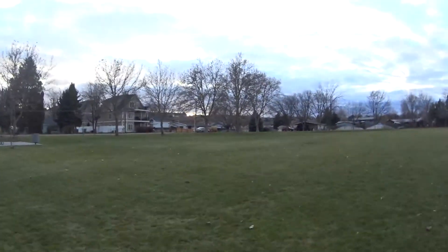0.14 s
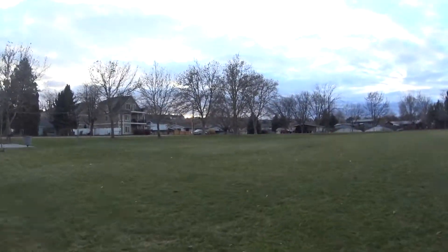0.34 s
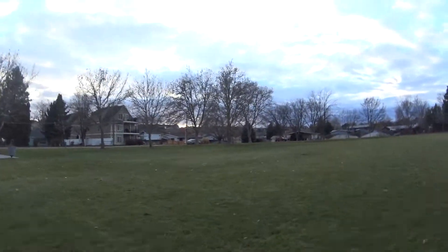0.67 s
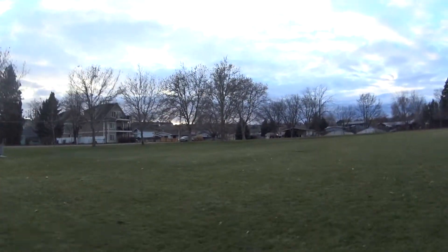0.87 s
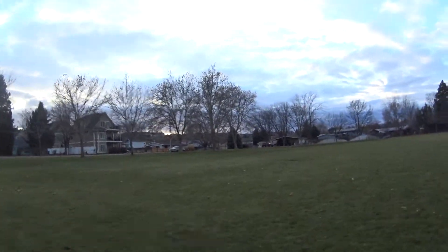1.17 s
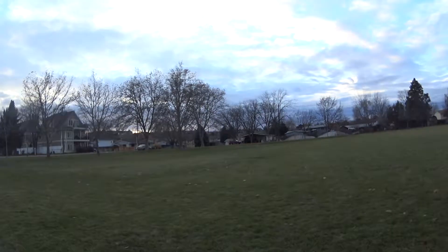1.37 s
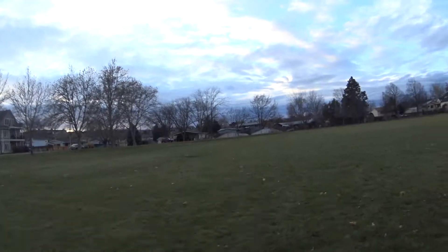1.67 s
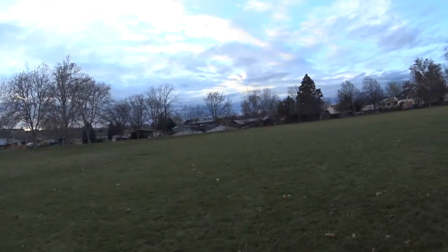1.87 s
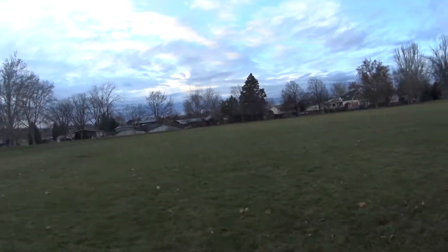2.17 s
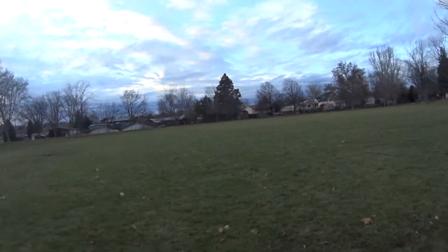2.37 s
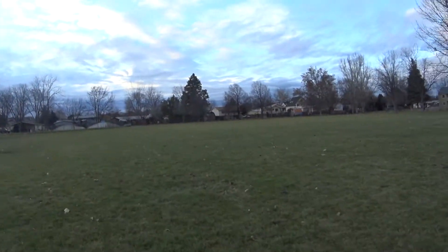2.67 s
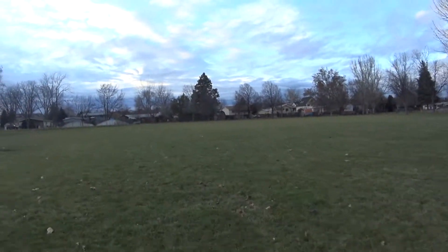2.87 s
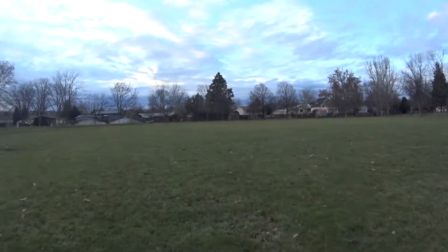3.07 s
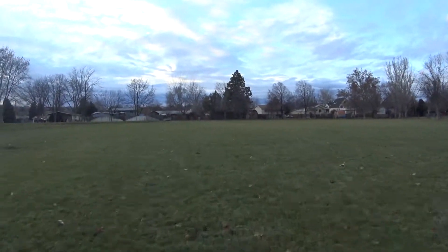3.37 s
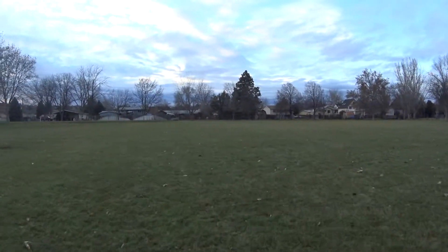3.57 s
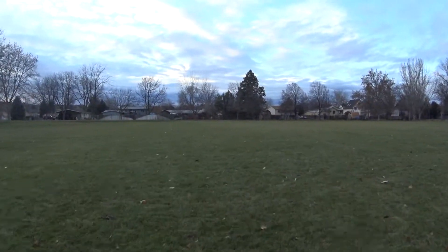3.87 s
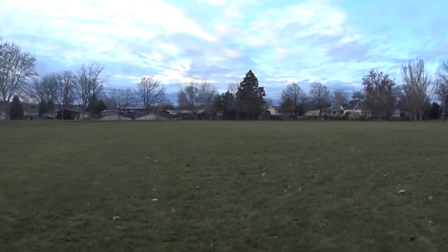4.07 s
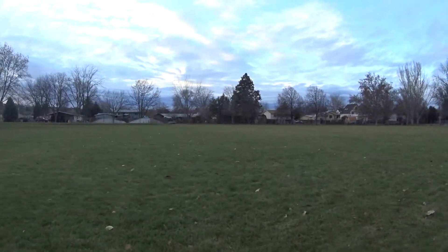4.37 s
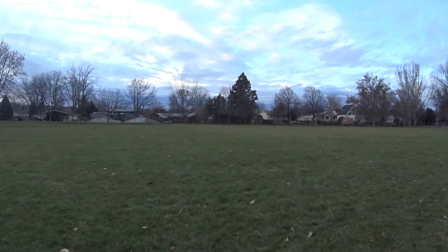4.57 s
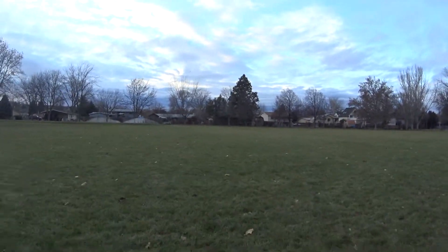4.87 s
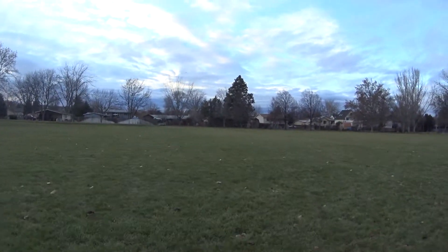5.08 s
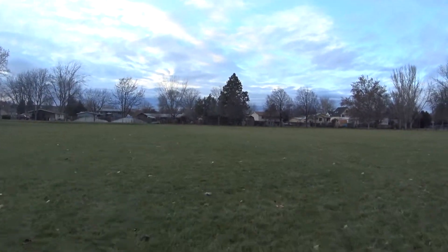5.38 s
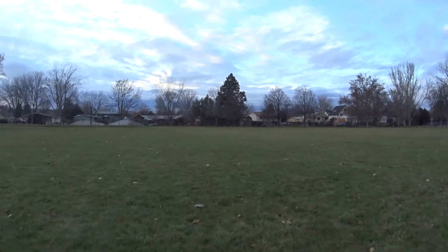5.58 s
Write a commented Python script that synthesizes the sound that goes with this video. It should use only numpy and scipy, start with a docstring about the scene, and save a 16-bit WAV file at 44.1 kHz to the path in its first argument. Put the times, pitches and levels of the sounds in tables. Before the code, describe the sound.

A six-rotor drone flies over a wide lawn, heard very close from the camera it carries, in dry outdoor stereo. The sound runs at full level from start to end: a harmonically rich buzz on a low hum near 135-147 Hz, made of six slightly different pitches that beat and waver. Chopped air rush, a mid-high rasp and fine hiss pulse with the blades, while faint motor singing and a thin steady whine near 8 kHz sit above. From 0 to 1 s the hover is fairly even, with a tiny lull and slap around 0.65 s. From about 1.2 s the turn raises the pitch and spreads the tones, roughest near 2.5 s, with slightly more low wind rumble. By 3.3 s the pitch drops and the tones gather into slower beating; the hiss is slightly brighter around 4.3 s. Brief slaps come near 2.3, 4.2, 4.9 and 5.0 s. The tones spread and rise again towards the end at 5.7 s.

```python
"""Over a lawn a six-rotor drone hovers and turns, heard from the camera that it carries.
Each propeller radiates harmonics of its own blade-pass rate; they beat, and spread apart in the turn.
Chopped turbulence rushes, rasps and hisses with the buzz, and vortices met by the blades slap.
The motors sing, their drives whine near 8 kHz by amplitude modulation, and an airstream rumbles."""
import sys
import numpy as np
from scipy import signal
from scipy.fft import rfft, irfft, next_fast_len
from scipy.io import wavfile
from scipy.ndimage import uniform_filter1d, map_coordinates

SR = 44100
rng = np.random.default_rng(int(sys.argv[2]) if len(sys.argv) > 2 else 0)


def transcribe(u):
    """Save the signal u as a 16-bit wav file named by the first command-line argument.

    u: samples, shape (n,) or (channels, n), limited to [-1, 1]; the rate is SR.
    q: integer samples, one column per channel.
    """
    v = np.clip(np.atleast_2d(u).T, -1, 1)
    q = np.round(v * 32767).astype(np.int16)
    wavfile.write(sys.argv[1], SR, q)


N = 253134  # length [samples]


def amp(db):
    """Level law: decibels to amplitude ratio."""
    return 10 ** (np.asarray(db) / 20)


def unit(x):
    """Normalisation to an rms of 1."""
    return x / np.sqrt(np.mean(x ** 2) + 1e-20)


def along(points, hz):
    """Linear interpolation of (position, value) points on a logarithmic axis."""
    position, value = np.transpose(points)
    return np.interp(np.log(hz + 1e-9), np.log(position), value)


def curves(rows):
    """Linear interpolation in time: one curve for each column after the time."""
    seconds, *columns = np.transpose(rows)
    t = np.arange(N) / SR
    return np.array([np.interp(t, seconds, column) for column in columns])


def wobble(rate):
    """Band-limited random fluctuation: a smooth curve through rate random knots a second."""
    knots = rng.standard_normal(int(N * rate / SR) + 4)
    return map_coordinates(knots, [np.arange(N) * rate / SR])


def filtered(x, response):
    """Linear filtering: the spectrum is multiplied by a complex response of frequency."""
    size = next_fast_len(N + SR // 2)
    hz = np.fft.rfftfreq(size, 1 / SR)
    return irfft(rfft(x, size) * response(hz), size)[..., :N]


def coloured(x, spectrum):
    """Spectral shaping by (frequency, level) points, at rms 1."""
    return unit(filtered(x, lambda hz: amp(along(spectrum, hz))))


# where each propeller runs within the spread of speeds (share of the spread, 0 = nominal rate)
SPEED_SHARES = [-.5, -.18, -.03, .08, .22, .45]


def blade_passes(nominal_hz, spread_hz, hunt, hunt_rate):
    """Phase is integrated frequency: blade passes counted as the flight controller trims each speed."""
    passes = []
    for share in SPEED_SHARES:
        rate_hz = (nominal_hz + share * spread_hz) * (1 + hunt * wobble(hunt_rate))
        passes.append(np.cumsum(rate_hz) / SR + 2 * rng.random())
    return np.array(passes)


# harmonics of one propeller: (multiple of the blade-pass rate, level [dB])
BLADE_HARMONICS = [(.5, -46), (1, -38), (2, -30), (3, -28), (4, -31.5), (5, -33), (6, -33), (7, -38.5),
                   (9, -39), (12, -50.5), (15, -45.5), (20, -58.5)]
# how strongly each propeller's fundamental and half-rate line reach the camera: (level [dB])
THRUM_DB = [3.5, -3.5, -11.5, -4, -7, 3.5]
# how strongly each propeller's overtones reach the camera, also its share of the air noise: (level [dB])
BITE_DB = [-6, -2, -3, 1.5, -1.5, -5.5]
# a propeller that runs faster than the others carries more load and buzzes louder [dB per Hz]
LOAD_DB_PER_HZ = 0.09


def buzz(passes, imbalance_db, flutter_db, flutter_rate, count=40, size=4096):
    """Periodic blade loading: one pressure wave per turn; unequal blades add lines halfway."""
    multiple = np.arange(1, count + 1) / 2  # two blades, so one turn is two blade passes
    out = np.zeros(N)
    for blade, thrum_db, bite_db in zip(passes, THRUM_DB, BITE_DB):
        level_db = along(BLADE_HARMONICS, multiple)
        level_db += imbalance_db * (multiple % 1 > 0)
        level_db += np.where(multiple > 1, bite_db, thrum_db)
        lines = amp(level_db) * np.exp(2j * np.pi * rng.random(count))
        turn = irfft(np.append(0, lines), size) * size / np.sqrt(2)
        turn = np.append(turn, turn[0])  # closes the cycle
        wave = np.interp(blade / 2 % 1 * size, np.arange(size + 1), turn)
        lead_hz = np.gradient(blade - passes.mean(axis=0)) * SR
        # uneven inflow changes the blade load
        load_db = LOAD_DB_PER_HZ * lead_hz + flutter_db * wobble(flutter_rate)
        out += wave * amp(load_db)
    return out


# the airframe passes some pitches better than others: (frequency [Hz], gain [dB])
AIRFRAME_GAIN = [(130, -0.5), (150, -2.5), (270, -0.5), (405, -1.5), (432, 3.5), (470, 0.5), (535, 6),
                 (600, -3), (690, -0.5), (820, 3), (880, -5), (1080, 0.5)]


def airframe(x):
    """Structural transmission: the frame favours some pitches of the buzz."""
    return filtered(x, lambda hz: amp(along(AIRFRAME_GAIN, hz)))


# singing of the motors' magnets: (multiple of the blade-pass rate, level before flutter [dB])
MAGNET_TONES = [(21, -59), (32, -59)]


def magnets(passes, flutter_db):
    """Magnetic excitation: magnets sweep past stator teeth at high multiples of the blade-pass rate."""
    out = np.zeros(N)
    for blade in passes:
        tones = sum(amp(db) * np.sin(2 * np.pi * k * blade) for k, db in MAGNET_TONES)
        out += amp(flutter_db * wobble(45)) * tones
    return out


def chopping(passes, sharpness):
    """Periodic amplitude modulation: a puff of air each time a blade crosses its arm."""
    puffs = np.exp(sharpness * np.cos(2 * np.pi * passes))
    return unit(np.sqrt(amp(BITE_DB) ** 2 @ puffs))  # the propellers' powers add


# brief lulls in the inflow: (time [s], change before normalisation [dB])
INFLOW_LULLS = [(.677, -7.5)]


def gusts(depth_db, rate, lull_width):
    """Random amplitude modulation: the gain of blade noise in uneven inflow, at rms 1."""
    t = np.arange(N) / SR
    lull_db = sum(db * np.exp(-((t - s) / lull_width) ** 2) for s, db in INFLOW_LULLS)
    return unit(amp(depth_db * wobble(rate) + lull_db))


def air_noise(envelope, spectrum, channels):
    """Broadband turbulence: random noise shaped in time, then in frequency, at rms 1."""
    return coloured(envelope * rng.standard_normal((channels, N)), spectrum)


def patchy(x, depth_db):
    """Turbulent intermittency: passing eddies make neighbouring bands swell and fade on their own."""
    bands = signal.stft(x, nperseg=1024)[2]
    field = uniform_filter1d(rng.standard_normal(bands.shape), size=7, axis=0)  # across frequency
    field = uniform_filter1d(field, size=8, axis=1)  # across time
    return unit(signal.istft(bands * amp(depth_db * unit(field)))[1][:N])


# turbulent air off the blades: (frequency [Hz], relative spectral level [dB])
WASH_SPECTRUM = [(90, -33.5), (180, -12.5), (300, -10.5), (480, 0.5), (640, -1.5), (850, 2), (1080, 0),
                 (1300, 1), (1600, -7.5), (2300, -19.5), (3300, -64)]
WASH_DB, EDDY_DB = -20, -33  # levels before the slow swells


def wash(inflow, chop, swell_db):
    """Modulated turbulence: the chopped rush off the blades, common to both ports."""
    rush = air_noise(inflow ** 0.55 * chop, WASH_SPECTRUM, channels=1)[0]
    return amp(WASH_DB + swell_db) * patchy(rush, depth_db=2.0)


def port_eddies(chop, swell_db):
    """Incoherent turbulence: independent chopped noise at each port."""
    return amp(EDDY_DB + swell_db) * air_noise(chop, WASH_SPECTRUM, channels=2)


# rasp of the blades passing the arms: (frequency [Hz], relative spectral level [dB])
RASP_SPECTRUM = [(500, -29.5), (1200, -3.5), (1600, -2.5), (1920, 4.5), (2250, 2), (2370, -7.5),
                 (2550, 2.5), (2750, -13.5), (3300, -18.5), (4000, -21.5), (4600, -19.5), (5800, -40.5)]
RASP_DB = -26  # before the swells and the treble changes
RASP_FOLLOWS = 0.57  # share of the treble change that the rasp follows


def arm_rasp(inflow, passes, treble_db, swell_db):
    """Blade-arm interaction: noise pulsed as blades pass the arms."""
    rasp = air_noise(inflow * chopping(passes, sharpness=1.3), RASP_SPECTRUM, channels=1)[0]
    return amp(RASP_DB + RASP_FOLLOWS * treble_db + swell_db) * patchy(rasp, depth_db=1.0)


# a propeller cuts through a vortex for a few blade passes: (time [s], peak level [dB])
VORTICES = [(.09, -24), (.21, -28), (0.636, -20), (1.045, -23), (2.17, -25.5), (2.328, -20.5), (4.16, -20),
            (4.859, -19), (5.035, -20)]
# colour of those slaps: (frequency [Hz], relative spectral level [dB])
SLAP_SPECTRUM = [(400, -26), (1500, -2.5), (2200, 3.5), (3000, -4), (4600, -10), (6000, -24), (9000, -32)]


def slaps(passes, width, sharpness, stray_db, scatter_db):
    """Blade-vortex interaction: a smack per blade pass in a vortex; weak ones come and go all the time."""
    t = np.arange(N) / SR
    vortex = sum(amp(db) * np.exp(-((t - s) / width) ** 2) for s, db in VORTICES)
    stray = amp(stray_db + scatter_db * np.minimum(wobble(35), 2))
    strongest = passes[np.argmax(BITE_DB)]
    smacks = np.exp(sharpness * (np.cos(2 * np.pi * strongest) - 1))
    return (vortex + stray) * smacks * air_noise(1, SLAP_SPECTRUM, channels=1)[0]


# fine hiss of the blade tips: (frequency [Hz], relative spectral level [dB])
HISS_SPECTRUM = [(600, -34.5), (1500, -4), (2400, 0.5), (2950, 4.5), (3400, -4.5), (4600, -5), (5600, -7.5),
                 (7400, -8), (8200, -6), (8850, -15.5), (9200, -41.5)]
# the hiss at the two ports: (frequency [Hz], left minus right [dB])
HISS_SIDE = [(2500, -2), (2900, 3), (3500, -3.5), (4200, -4), (4900, 4.5), (5700, -3.5), (6300, 2.5),
             (6700, 1), (7000, 11), (7300, -3.5), (7800, 1.5), (8300, 3.5)]
HISS_DB = -36  # before the swells, the treble changes and the port difference


def tip_hiss(envelope, treble_db, swell_db):
    """Path dependence of short waves: the tip hiss reaches each port by different paths."""
    def port_gains(hz):
        half_db = along(HISS_SIDE, hz) / 2
        return amp([half_db, -half_db])

    hiss = filtered(air_noise(envelope, HISS_SPECTRUM, channels=2), port_gains)
    return amp(HISS_DB + treble_db + swell_db) * hiss


# switching rate of each motor drive: (frequency [Hz])
DRIVE_CARRIERS = [7983.7, 7985.4, 7996.5, 8030.4, 8042.7, 8041.9]
# shares of the drives in the whine: (left level [dB], right level [dB])
DRIVE_SHARES = [(-4.5, -7.5), (-13.5, 0.5), (-4, -17.5), (0.5, 2), (0, 2), (-10, -12.5)]
# level at zero spread [dB], its fall as the propellers spread apart [dB per Hz]
WHINE_DB, WHINE_DROP_DB_PER_HZ = -46.5, 0.25
WHINE_WAVER_DB, WHINE_WAVER_RATE = 1, 9.8  # depth [dB], rate [knots per s]


def whine(passes, spread_hz, depth, second, flutter, flutter_rate):
    """Amplitude modulation: six switching tones beat; each blade's load puts sidebands around its own."""
    level_db = WHINE_DB - WHINE_DROP_DB_PER_HZ * spread_hz
    level_db += WHINE_WAVER_DB * wobble(WHINE_WAVER_RATE)
    t = np.arange(N) / SR
    out = np.zeros((2, N))
    for hz, port_db, blade in zip(DRIVE_CARRIERS, DRIVE_SHARES, passes):
        shake = flutter * wobble(flutter_rate)
        for port, db in enumerate(port_db):
            angle = 2 * np.pi * (blade + rng.random())
            load = unit(np.cos(angle) + second * np.cos(2 * angle))
            carrier = np.sin(2 * np.pi * hz * t + port * np.pi / 2)  # ports a quarter cycle apart
            out[port] += amp(db) * unit((1 + depth * load + shake) * carrier)
    return amp(level_db) * out


# airstream on the microphone: (time [s], level before gusts [dB])
AIRSTREAM_LEVEL = [(0, -43.5), (1.2, -42.5), (2.6, -38), (3.3, -48), (5.74, -45)]
# its rumble: (frequency [Hz], relative spectral level [dB])
RUMBLE_SPECTRUM = [(20, -5), (50, -4.5), (85, 0), (130, 6.5), (220, -5.5), (400, -21), (900, -39)]


def airstream(gust_db):
    """Flow-induced pressure: air rumbles over the microphone as low noise in gusts."""
    [level_db] = curves(AIRSTREAM_LEVEL)
    rumble = air_noise(1, RUMBLE_SPECTRUM, channels=1)[0]
    return amp(level_db + gust_db * wobble(6.7)) * rumble


# level between the two microphone ports: (frequency [Hz], left minus right [dB])
PORT_LEVEL = [(100, .6), (300, -0.1), (550, -1.8), (800, -1.1), (1000, -4), (1400, -6), (2200, -8),
              (2800, -5), (4500, -3)]
# phase between the two ports: (frequency [Hz], lead of the left [rad])
PORT_PHASE = [(30, -.2), (70, -.5), (140, -.6), (285, -1), (450, -1.3), (680, -1.8), (1400, -1.25),
              (2300, -.85), (2600, -2.6), (3400, -1.3), (4400, -.3)]


def ports(x):
    """Diffraction: sound bends round the camera body, reaching the left port later and duller."""
    def responses(hz):
        half = np.log(amp(along(PORT_LEVEL, hz))) / 2 + .5j * along(PORT_PHASE, hz)
        return np.exp([half, -half])

    return filtered(x, responses)


# flight control before hunting: (time [s], nominal blade-pass rate [Hz], scale of the speed spread [Hz])
FLIGHT = [(0, 136.7, 11.1), (.35, 134.8, 12.94), (.9, 136.4, 9.9), (1.3, 140.5, 18.2), (1.75, 143.3, 18.36),
          (2.2, 147.1, 24.7), (2.55, 146.5, 34), (2.87, 145.9, 21.8), (3.25, 139.9, 8), (3.65, 139.1, 9.5),
          (4.3, 142.9, 8.05), (4.75, 142.3, 6.35), (5.25, 143.7, 14.35), (5.74, 146.4, 18.7)]
# level of the treble: (time [s], change [dB])
TREBLE = [(0, -1.5), (1.1, -1.5), (2, .5), (3.1, 0.4), (3.7, .8), (4.3, 1.5), (4.8, 1), (5.3, 0.1),
          (5.74, 1)]
SWELL_DB, SWELL_RATE = 0.77, 11  # slow swells of the inflow: depth [dB], rate [knots per s]


def scene():
    """Superposition: most sources reach both ports through the body; eddies, hiss and whine differ."""
    nominal_hz, spread_hz = curves(FLIGHT)
    [treble_db] = curves(TREBLE)
    passes = blade_passes(nominal_hz, spread_hz, hunt=0.004, hunt_rate=12)
    swell_db = SWELL_DB * wobble(SWELL_RATE)
    chop = chopping(passes, sharpness=1.1)
    inflow = gusts(depth_db=2.0, rate=70, lull_width=0.019)

    common = airframe(buzz(passes, imbalance_db=-16, flutter_db=1.13, flutter_rate=30))
    common += magnets(passes, flutter_db=3.0)
    # gusts stir the rasp most, the wash and the tip hiss less
    common += wash(inflow, chop, swell_db)
    common += arm_rasp(inflow, passes, treble_db, swell_db)
    common += slaps(passes, width=0.014, sharpness=4.5, stray_db=-39.0, scatter_db=4.0)
    common += airstream(gust_db=3.5)

    eddies = port_eddies(chop, swell_db)
    hiss = tip_hiss(inflow ** 0.84 * chopping(passes, sharpness=0.31), treble_db, swell_db)
    drives = whine(passes, spread_hz, depth=0.33, second=1.5, flutter=0.39, flutter_rate=45)
    return ports(common) + eddies + hiss + drives


def gain_control(x, target_db, strength, window):
    """Level compression: the camera rides its gain against short-term power, flattening loud beats."""
    weights = signal.windows.hann(int(window * SR))

    def smooth(v):
        return signal.fftconvolve(v, weights, "same")

    power = np.abs(smooth(np.mean(x ** 2, axis=0))) / smooth(np.ones(N))
    return x * (amp(target_db) / np.sqrt(power)) ** strength


TOP_HZ = 9200  # highest frequency heard [Hz]: the sound is empty above this


def record(dry):
    """Compression, soft saturation of the highest peaks, then a low-pass with nothing heard above it."""
    x = gain_control(dry, target_db=-14.0, strength=.55, window=.06)  # window [s]
    x = x / (1 + (x / .76) ** 8) ** (1 / 8)
    return filtered(x, lambda hz: hz < TOP_HZ)


dry = scene()
out = record(dry)
transcribe(out)
```